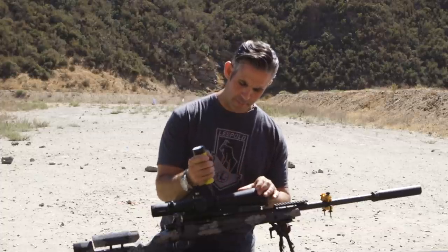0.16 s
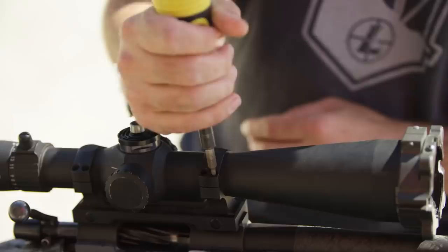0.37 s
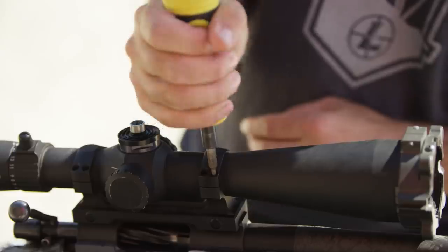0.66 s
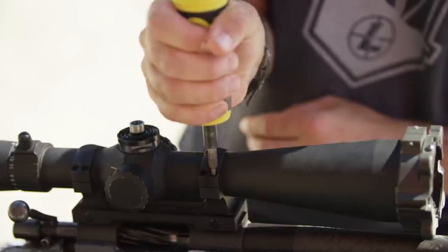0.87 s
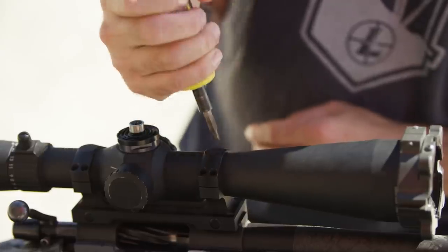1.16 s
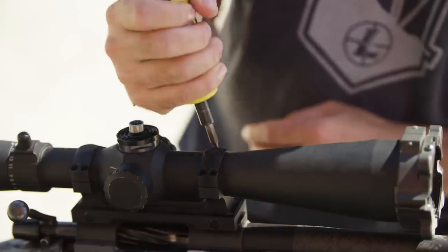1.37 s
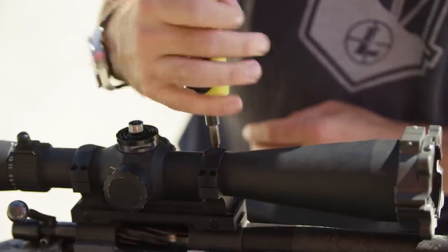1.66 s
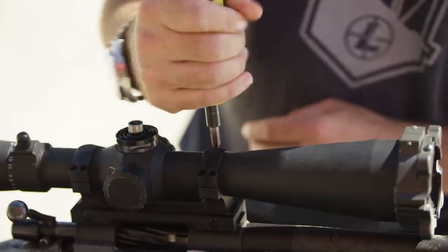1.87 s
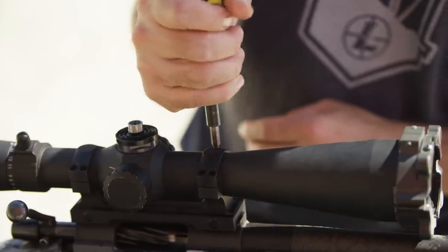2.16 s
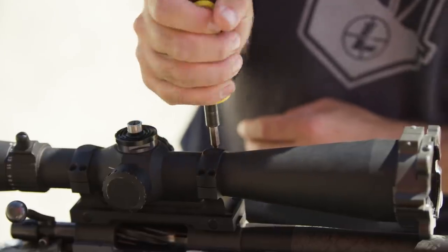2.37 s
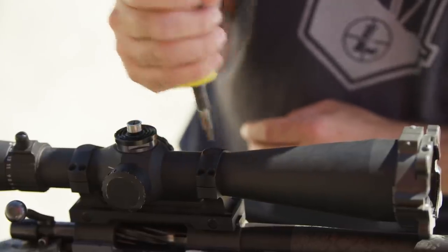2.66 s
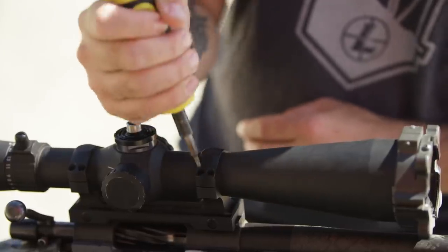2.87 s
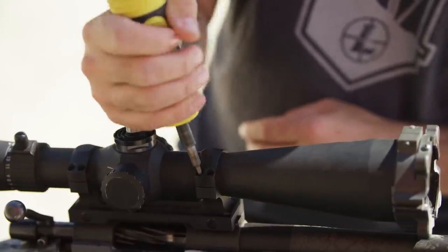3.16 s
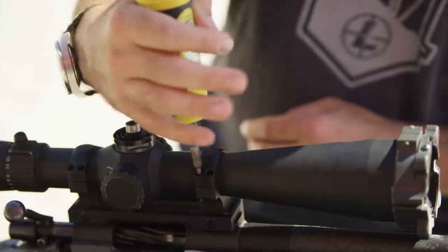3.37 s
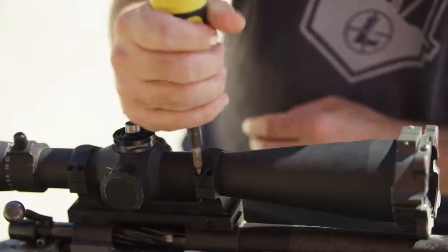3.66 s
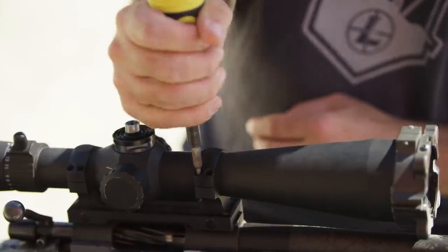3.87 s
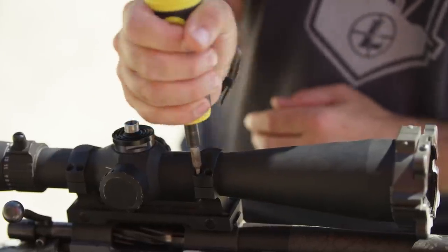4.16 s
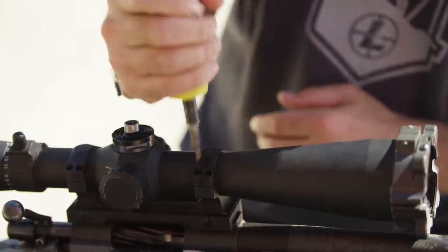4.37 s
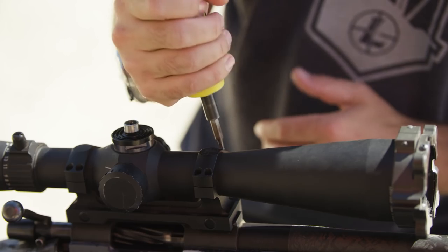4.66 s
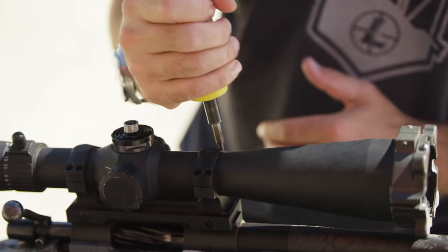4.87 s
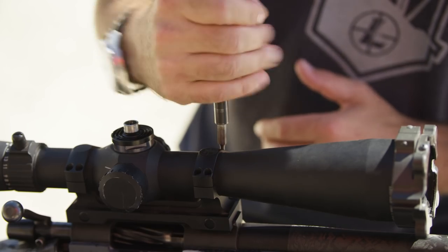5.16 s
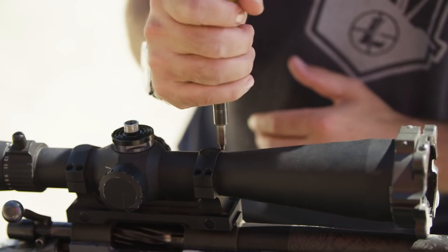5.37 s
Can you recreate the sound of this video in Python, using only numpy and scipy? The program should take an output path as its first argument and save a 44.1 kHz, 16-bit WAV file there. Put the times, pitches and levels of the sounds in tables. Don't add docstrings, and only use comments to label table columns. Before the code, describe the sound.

Outdoors in open air, heard close by a body-worn microphone with little reverberation. From 0 to 0.4 s there is quiet air, soft low wind, a faint sleeve rustle, tiny ticks and a thin metallic ring. At about 0.44 s the background changes abruptly to a faint distant machine drone with a weak steady whine and slightly brighter hiss. A bit clicks onto a screw at 0.5 s. Loud, sharp steel double clicks snap at 0.88, 2.49 and 4.09 s, each with a brief rattle and short metallic decay through the mount. Between them come light taps, scrapes, finger rubs and dull knocks, with a strong clack at 2.1 s, more at 2.25 s and a cluster at 3.6 to 3.9 s. Low wind flutters and thumps, strongest from 1.1 to 2.9 s, with further puffs near 3.6 s. After 4.3 s it eases to soft low puffs, faint drone and a few small ticks until 5.5 s.

```python
import sys
import numpy as np
from scipy import signal
from scipy.fft import rfft, irfft, next_fast_len
from scipy.io import wavfile
from scipy.ndimage import uniform_filter1d, map_coordinates

SR = 44100
rng = np.random.default_rng(int(sys.argv[2]) if len(sys.argv) > 2 else 0)


def transcribe(u):
    v = np.clip(np.atleast_2d(u).T, -1, 1)
    q = np.round(v * 32767).astype(np.int16)
    wavfile.write(sys.argv[1], SR, q)


def how_loud(loudness_db):
    steps = np.asarray(loudness_db, float) / 20
    return 10 ** steps


N = 242671

# (time [s], level [dB])
WIND = [(0, -56), (.28, -60), (.38, -64), (.62, -58.5), (1.03, -49), (1.6, -53.5), (2.05, -56.5),
        (2.6, -47.5), (2.85, -48.5), (2.94, -63.5), (3.2, -59), (3.48, -58), (3.65, -53), (3.9, -62),
        (4.08, -52), (4.28, -53.5), (4.33, -72), (4.45, -69.5), (5.5, -69.5)]
# (time [s], peak [dB], length [s], sharpness [dB])
GUSTS = [(0.25, -68.5, 0.05, 10), (0.512, -55.5, 0.078, -7), (0.683, -63.5, 0.11, 6),
         (1.203, -47.5, 0.14, 2), (1.343, -51, 0.067, -8), (1.455, -51.5, 0.084, 2),
         (1.576, -48, 0.037, -13), (1.757, -49, 0.14, 5), (1.858, -50.5, 0.045, -2), (4.3, -65, 0.037, 2),
         (1.968, -46.5, 0.15, -6.5), (0.907, -60.5, 0.11, 4), (2.378, -54, 0.041, -37),
         (2.528, -62, 0.083, 4), (2.75, -58, 0.04, 0), (2.871, -54.5, 0.046, 6), (2.995, -54.5, 0.05, -5),
         (3.109, -52, 0.074, -17), (3.58, -53, 0.057, -7.5), (3.764, -56.5, 0.097, -2),
         (3.877, -58, 0.029, 0), (4.537, -52, 0.032, -9), (4.655, -55, 0.062, -23.5),
         (4.754, -61, .08, -19.5), (4.866, -64, 0.039, -23), (4.978, -59, 0.068, -10.5)]
# (frequency [Hz], level [dB])
LOW_EDDIES = [(12, -28.5), (25, 2), (50, 4), (85, -3), (130, -33), (300, -59.5)]
SMALL_EDDIES = [(50, -31), (95, 0.5), (130, -5), (200, -13), (330, -20), (600, -35), (1200, -77)]
# (time [s], peak [dB], rate [Hz], lean [0-1])
POPS = [(1.447, -36, 60.7, 0.83), (1.661, -42, 60.6, 0.75), (2.631, -33.5, 60, 0.8),
        (2.695, -38, 60.7, 0.66), (3.74, -32.5, 64.3, 0.75), (4.535, -53, 60.1, 0.38),
        (4.644, -49.5, 59.6, 0.5), (4.743, -48.5, 60, 0.6), (4.852, -57, 60, 0.5), (.654, -41, 88.5, 0.6),
        (0.732, -40.5, 69.5, 0.56), (0.932, -38.5, 100, .45), (1.004, -40.5, 60.4, 0.06),
        (1.123, -39, 90, .7), (1.154, -34.5, 100, 0.36), (1.176, -33.5, 120, 0.3), (1.197, -34.5, 79, 0.65),
        (1.219, -37, 80, 0.96), (1.237, -36, 70, .8), (1.569, -43, 50, 0.3), (1.587, -41, 60, 0.04),
        (1.697, -42, 100, 0.1), (1.707, -35, 99, 0.46), (1.735, -42, 99, .2), (1.766, -33, 81, 0.3),
        (1.782, -36, 120, 0.9), (1.797, -44, 82, .9), (1.807, -37, 101, 0.4), (1.918, -37, 40, .9),
        (2.455, -41, 80.06, 0.1), (2.484, -36, 102.5, 0), (2.878, -43.5, 39.7, 0.72),
        (3.563, -39.5, 80, 0.6), (3.578, -40.5, 78.7, 0.76)]
SHELTER_S, EXPOSED_DB, SHELTERED_DB = 4.32, -3, -25.5

# (frequency [Hz], density [dB per Hz])
OPEN_AIR = [(120, -26), (200, 3.5), (425, -2), (1350, -6), (1550, -22), (1610, -9), (5000, -37),
            (6500, -64), (11000, -120)]
DRONE = [(88, -41.5), (150, -21.5), (367, -20), (425, -12.5), (464, -16), (660, -9.5), (764, -7.5),
         (799, -5.5), (1090, -13), (1240, -30), (1540, -28.5), (1640, -14.5), (1800, -11), (2000, -19),
         (2440, -24.5), (3130, -28.5), (5000, -36.5), (6500, -68.5), (11000, -120)]
# (frequency [Hz], density [dB per Hz])
DULL_HISS = [(2060, -37), (3500, -7), (12100, -7), (13300, -18), (15400, -14.5), (16500, -24)]
HISS = [(2060, -38.5), (3500, -11.5), (6360, -8), (8970, -5), (10500, -3), (12200, -10.5), (15300, -9),
        (16100, -16), (16500, -33.5)]
# (time [s], level [dB])
WHINE = [(.44, -65), (.9, -69), (1.12, -85), (1.24, -72), (1.86, -70.5), (1.98, -64), (2.27, -66),
         (2.58, -69), (3.6, -67.5), (3.74, -75), (3.88, -69), (4.23, -70), (4.75, -65.5), (4.92, -72),
         (5.5, -70)]
# (time [s], length [s], lift [dB])
BRUSH = [(3.303, 0.39, 2), (4.7, 0.49, 1), (2.4, .25, 2), (1.1, .3, 0.4), (3.2, .3, 1.5),
         (5.24, 0.33, -1.5)]
CUT_S, BLADE_HZ = .437, 758.5
OPEN_DB, DRONE_DB, DULL_DB, HISS_DB = -68.5, -64, -80.5, -77

# (frequency [Hz], level [dB])
CLOTH = [(500, -31.5), (900, 4), (1300, -0.5), (2500, -7.5), (4500, -14.5), (8000, -39)]
# (time [s], length [s], level [dB])
SHIFTS = [
    (0.01, 0.2, -74.5),
    (2.35, 0.38, -72),
]
RUSTLE_DB, SETTLED_DB = -73.5, -80

# (start [s], stop [s])
RING_S = [(0, .2), (0, .15), (0, .22), (.014, .243), (.345, .4), (.512, .56), (2.108, 2.17), (2.257, 2.33),
          (4.923, 4.98), (3.62, 3.66), (3.669, 3.7), (3.686, 3.72), (2.072, 2.105)]
# (frequency [Hz], level [dB], t60 [s], rise [s])
LONE_RINGS = [(1186, -66, 0.82, 0.00092), (2080, -62, 0.18, .001), (2310, -65, 0.7, .001),
              (2887, -56.5, 0.78, 0.015), (1670, -55.5, 0.093, 0.0026), (2350, -54, 0.087, 0.0018),
              (1643, -33.5, 0.057, 0.00091), (662, -48, 0.1, 0.0034), (5870, -56.5, 0.0462, .001),
              (1610, -47.5, 0.045, 0.0016), (1655, -38, 0.053, 0.0021), (1630, -46, 0.037, 0.0018),
              (1700, -59, 0.11, .003)]

# (time [s], shaft [dB], mount [dB], tip [dB])
SEATS = [(0.0687, -48, -66, -76), (0.2534, -71, -60.5, -85), (0.5106, -38.5, -48, -88),
         (0.5299, -44, -53, -78), (1.1534, -54.5, -62, -60), (1.2435, -64, -79, -53.5),
         (1.4484, -66, -58.5, -70), (1.7664, -33, -45.5, -54.5), (1.933, -46.5, -56, -75.5),
         (2.0127, -68, -67, -66), (2.031, -75, -47.5, -58), (2.0753, -52, -48, -70),
         (2.1068, -25, -36.5, -52), (2.1094, -46, -47, -49.5), (2.241, -31, -47, -64),
         (2.2546, -36.5, -45.5, -71), (2.267, -37, -54, -71), (2.565, -49, -55, -78),
         (2.5933, -38.5, -53, -80), (2.6126, -56, -54, -79), (2.7313, -48, -46, -57),
         (3.087, -56, -57.5, -74.5), (3.3025, -56, -50, -60), (3.8166, -46.5, -74, -74),
         (3.883, -35, -56, -67), (4.2972, -70, -61, -71.5), (4.9592, -58, -56.5, -76.5),
         (.197, -62, -74, -85), (.236, -71, -73, -85), (.325, -60, -60, -82), (.376, -66, -63, -83),
         (3.828, -55, -70, -64)]
TAPS = [(.063, -44, -65, -78), (0.29, -75, -63, -86), (.3436, -70, -61, -81), (0.5019, -43, -52, -62),
        (0.684, -53.5, -64, -56.5), (0.874, -40, -36.5, -69), (0.876, -53, -55, -69.5),
        (1.3846, -50, -55, -65), (1.7719, -63, -50, -58), (2.0706, -40.5, -40.5, -46),
        (2.117, -52, -60, -72), (3.2236, -57, -72, -55.5), (3.6201, -51, -52.5, -68.5),
        (3.6697, -42, -43.5, -75), (3.676, -33.5, -49, -80.5), (3.6863, -35.5, -48, -81),
        (3.7693, -42, -53, -60), (3.863, -42.5, -68, -57), (3.8744, -34.5, -43.5, -72),
        (3.879, -55.5, -56, -59), (4.3063, -58, -61, -45), (4.7152, -52, -53, -61), (0.108, -62, -57, -75),
        (.222, -69, -72, -85), (2.174, -62, -70, -75)]
GRAZES = [(.783, -48.5, -70, -61), (1.052, -81, -61.5, -72), (1.547, -49, -64, -57.5),
          (2.15, -63, -73.5, -73), (2.2442, -32.5, -44.5, -45), (2.2933, -50, -69, -63),
          (2.32, -55, -68, -63), (2.7258, -49, -56, -46), (2.7453, -43, -59, -46),
          (2.7514, -48.5, -57.5, -54), (3.275, -55, -64.5, -61), (3.38, -56, -63, -76),
          (4.3347, -54.5, -63, -62), (4.9232, -49.5, -65.5, -74.5), (4.933, -58, -64, -74),
          (.645, -58, -80, -80), (.61, -62, -70, -72), (2.767, -68, -73, -63), (.995, -64, -71, -68)]
# (frequency [Hz], t60 [s])
CONTACT = [
    (3050, 0.01),
    (3900, 0.009),
    (5950, 0.018),
]
# (frequency [Hz], width [Hz], level [dB])
TIP = [(6800, 900, -8), (8550, 700, 0.5), (10900, 1200, 1), (12380, 1200, -2.5), (14300, 1800, -11.5)]
# (time [s], level [dB], frequency [Hz], t60 [s])
KNOCKS = [(0.9, -42.5, 734, 0.086), (.883, -49, 710, 0.067), (2.108, -38.5, 710, 0.16),
          (2.245, -40.5, 580, 0.094), (2.257, -57, 860, 0.12), (2.49, -40.5, 695, 0.033),
          (3.303, -49.5, 820, 0.026), (3.876, -39, 660, 0.13), (3.876, -44, 230, 0.23),
          (2.11, -45, 254, 0.11), (3.879, -34, 1170, 0.035), (3.672, -49, 1240, 0.054),
          (4.095, -41.5, 800, 0.05), (2.112, -42, 1260, 0.044), (1.9, -39.5, 1220, 0.026),
          (2.492, -48, 360, 0.027), (.884, -45, 390, .06), (4.096, -50, 270, 0.075), (0.0051, -59, 750, .2)]

# (time [s], length [s], level [dB], centre [Hz])
RUBS = [(0.132, 0.078, -65.5, 2780), (0.152, 0.034, -61, 6250), (0.293, 0.0058, -64, 7300),
        (0.324, 0.098, -75.5, 3500), (1.066, 0.018, -67, 8070), (1.13, 0.015, -67, 8000),
        (3.313, 0.024, -70, 5000), (3.664, 0.079, -70, 3000), (3.82, 0.054, -70.5, 5980),
        (3.866, 0.022, -68, 2000), (2.266, 0.029, -70, 4000), (2.464, 0.025, -67.5, 2990),
        (2.4, 0.064, -69, 4600)]

# (leaving [s], landing [s], rebound [s])
STRIKE_S = [
    (.8830, .8841, .8845),
    (2.4916, 2.4927, 2.4931),
    (4.0942, 4.0953, 4.0957),
]
# (leaving [dB], landing [dB], rebound [dB], rattle [dB])
SLIPS = [
    (-6.5, -2, -14.5, -27.5),
    (-10.5, -2, -17.5, -26.5),
    (-7.5, -5, -7, -27),
]
CAM_HZ = [2270, 2750, 4280, 4830, 6050, 6900, 8240, 8750, 9850, 10400, 11200, 12200, 12900, 13800]
# (width [Hz], slip 1 [dB], slip 2 [dB], slip 3 [dB])
CAM = [(450, -10.5, -12.5, -11.5), (400, -22.5, -18.5, -14), (395, -2, -15, 2), (350, -1, -19, -15),
       (400, -9.5, -10, -5.5), (450, -14.5, -12, -18), (350.3, -15, -5, -14.5), (400, -7, -8.5, -5),
       (400, -6.5, -8.5, -3.5), (450, -4, 1, -4), (600, 2.5, -0.5, 3.5), (499.8, -12.5, -15, 0),
       (499, -8.5, -13, -4.5), (600, -9.5, -14.5, 2)]
EDGE_DB = [-18.5, -13, -14.5]
SHEEN_DB = [-26, -23.5, -24]
# (frequency [Hz], density [dB per Hz])
RATTLE = [(290, -57), (500, -25), (1190, -7.5), (1520, -8), (1660, -8), (1810, -16.5), (2320, -1),
          (3070, -9.5), (11000, -2.5), (16500, -33)]
MURMUR_DB = [-17, -18.5, -19.5]
MURMUR_T60_S = 0.2
MOUNT_HZ = [1150, 1222, 1448, 1669, 1972, 2070, 2342, 2704, 2826, 2200, 2520]
# (t60 [s], slip 1 [dB], slip 2 [dB], slip 3 [dB])
MOUNT = [(0.22, -45.5, -44.5, -52.5), (.3, -45.5, -53.5, -47), (0.054, -56, -53, -48),
         (0.11, -32.5, -34, -34.5), (.16, -46, -39, -48), (0.13, -46.5, -35, -40),
         (0.22, -43.5, -44.5, -40), (0.08, -36, -36.5, -43), (0.07, -43, -46.5, -44.5),
         (.12, -48.5, -45, -45), (.14, -46.5, -48, -45.5)]
MOUNT_RISE_S, MOUNT_WIDTH_HZ, MOUNT_WAKES_DB = 0.014, 90, -0.5
TWIN_GAP, TWIN_DB, TWIN_LIFE = .011, -5.5, 0.41


def unit(x):
    return x / np.sqrt(np.mean(x ** 2) + 1e-20)


def curves(rows):
    s, *cols = np.transpose(rows)
    return [np.interp(np.arange(N) / SR, s, c) for c in cols]


def wobble(rate, size=N):
    knots = rng.standard_normal(int(size * rate / SR) + 4)
    return map_coordinates(knots, [np.arange(size) * rate / SR])


def filtered(x, response):
    m = next_fast_len(len(x) + min(8192, len(x) // 3))
    return irfft(rfft(x, m) * response(np.fft.rfftfreq(m, 1 / SR)), m)[:len(x)]


def noise(spectrum, size=N):
    f, db = np.transpose(spectrum)
    colour = lambda hz: how_loud(np.interp(np.log(hz + 1), np.log(f), db))
    return unit(filtered(rng.standard_normal(size), colour))


def steady(x, span_s):
    power = np.abs(uniform_filter1d(x * x, round(span_s * SR)))
    return unit(x / np.sqrt(power + 0.2))


def bell(s, length):
    return np.exp(-(2 * (np.arange(N) / SR - s) / length) ** 2)


def switch(s, before, after, span_s):
    share = np.clip((np.arange(N) / SR - s) / span_s, 0, 1)
    return (1 - share) * before + share * after


def add(track, s, sound):
    part = track[round(s * SR):][:len(sound)]
    part += sound[:len(part)]


def resonance(f, hz, width_hz):
    return 1j * f * width_hz / (hz * hz - f * f + 1j * f * width_hz)


def body(modes):
    return lambda f: sum((-1) ** k * how_loud(db) * resonance(f, hz, w) for k, (hz, w, db) in enumerate(modes))


def ring(hz, db, t60, t, rise, grip_db):
    grip = how_loud(grip_db * wobble(55, size=len(t)))
    drift = .15 * grip_db * wobble(45, size=len(t))
    decay = how_loud(db - 60 * t / t60) * (1 - np.exp(-t / rise))
    return grip * decay * np.sin(2 * np.pi * hz * t + drift)


def burst(hz, width_hz, fade):
    push = fade * rng.standard_normal(len(fade)) * how_loud(3.2 * wobble(900, size=len(fade)))
    push[8] += 4 * fade.max()
    x = filtered(push, lambda f: resonance(f, hz, width_hz) ** 3)
    return x / np.abs(x).max()


def wind():
    breeze = how_loud(curves(WIND)[0])
    low = breeze + sum(how_loud(db) * bell(s, length) for s, db, length, _ in GUSTS)
    small = breeze * how_loud(switch(SHELTER_S, EXPOSED_DB, SHELTERED_DB, span_s=0.036))
    small = small + sum(how_loud(db + sharp_db) * bell(s, length) for s, db, length, sharp_db in GUSTS)
    lumps = 1.3 * wobble(23)
    out = low * unit(how_loud(lumps) * steady(noise(LOW_EDDIES), span_s=0.023))
    fine_lumps = how_loud(2 * lumps + 1.2 * wobble(45))
    out = out + small * unit(fine_lumps * steady(noise(SMALL_EDDIES), span_s=.05))
    for s, db, hz, lean in POPS:
        u = (np.arange(SR // 10) / SR - .02) * hz * 4.15
        add(out, s - .02, 2 * how_loud(db) * (u + lean - .5) * np.exp(-u * u))
    return out


def surroundings():
    far = switch(CUT_S, how_loud(OPEN_DB) * noise(OPEN_AIR), how_loud(DRONE_DB) * noise(DRONE), span_s=.003)
    hiss = switch(CUT_S, how_loud(DULL_DB) * noise(DULL_HISS), how_loud(HISS_DB) * noise(HISS), span_s=.003)
    phase = 2 * np.pi * BLADE_HZ * np.arange(N) / SR + 0.5 * wobble(8.5)
    tone = np.sin(phase) * how_loud(curves(WHINE)[0] + 1.6 * wobble(25) + 3.0)
    brush_db = sum(db * bell(s, length) for s, length, db in BRUSH)
    out = how_loud(0.28 * wobble(20)) * far + switch(CUT_S, 0, tone, span_s=.003)
    return out + how_loud(0.44 * wobble(8.2) + brush_db) * hiss


def cloth():
    effort = how_loud(switch(SHELTER_S, RUSTLE_DB, SETTLED_DB, span_s=0.17))
    effort = effort + sum(how_loud(db) * bell(s, length) for s, length, db in SHIFTS)
    return effort * how_loud(3.3 * wobble(30)) * noise(CLOTH)


def lone_rings():
    out = np.zeros(N)
    for (start, stop), (hz, db, t60, rise) in zip(RING_S, LONE_RINGS):
        t = np.arange(round((stop - start) * SR)) / SR
        damping = np.clip((t[-1] - t) / 0.0099, 0, 1)
        add(out, start, ring(hz, db, t60, t, rise, grip_db=1.5) * damping)
    return out


def bit():
    out, t = np.zeros(N), np.arange(SR // 8) / SR
    fade = lambda t60: how_loud(-60 * t / np.clip(t60, .003, .2)) * (1 - np.exp(-t / 0.00032))
    mount_modes = body([(hz, MOUNT_WIDTH_HZ, 0) for hz in MOUNT_HZ])
    for contacts, (shaft_hz, t60) in zip((SEATS, TAPS, GRAZES), CONTACT):
        for s, shaft_db, mount_db, tip_db in contacts:
            ping = burst(shaft_hz, .4 * shaft_hz, fade(t60))
            overtone = burst(1.3 * shaft_hz, 0.96 * shaft_hz, fade(2.5 * t60))
            shaft = how_loud(shaft_db - 5.5) * (ping + how_loud(-1.0) * overtone)
            thud = burst(2100, 3800, fade(1.1 * t60) + how_loud(-17.5) * fade(0.23))
            woken = filtered(burst(1900, 2500, fade(1.1 * t60)), mount_modes)
            mount = how_loud(mount_db + 3.5) * thud
            mount = mount + how_loud(mount_db + MOUNT_WAKES_DB) * woken / np.abs(woken).max()
            tip = filtered(burst(10000, 9000, fade(.6 * t60)), body(TIP))
            add(out, s, shaft + mount + how_loud(tip_db + 5.5) * tip / np.abs(tip).max())
    for s, db, hz, t60 in KNOCKS:
        add(out, s, how_loud(db) * burst(hz, 1.0 * hz, fade(t60)))
    return out


def fingers():
    grain = how_loud(3.4 * wobble(340))
    out = np.zeros(N)
    for s, length, db, hz in RUBS:
        skin = unit(filtered(rng.standard_normal(N), lambda f: resonance(f, hz, 1.56 * hz) ** 2))
        out += how_loud(db) * bell(s, length) * grain * skin
    return out


def cam():
    out, t = np.zeros(N), np.arange(SR // 3) / SR
    for k, (times, (*strike_db, rattle_db)) in enumerate(zip(STRIKE_S, SLIPS)):
        steel = lambda f: sum(how_loud(dbs[k]) * resonance(f, hz, w) for hz, (w, *dbs) in zip(CAM_HZ, CAM))
        for at, db in zip(times, strike_db):
            chatter = 0.15 * rng.standard_normal(len(t)) * how_loud(-60 * t / 0.0036)
            blow = (t == 0) + chatter
            contact = 1 - np.exp(-(t + 1 / SR) / 0.00011)
            strike = filtered(blow, steel) * contact
            add(out, at, how_loud(db) * strike / np.abs(strike).max())
        add(out, times[0], how_loud(EDGE_DB[k]) * burst(5400, 7000, how_loud(-60 * t / .004)))
        add(out, times[0], how_loud(SHEEN_DB[k]) * burst(15200, 3000, how_loud(-60 * t / 0.0074)))

        fade = how_loud(-60 * t / .03) + how_loud(-11.0 - 60 * t / 0.13)
        rattle = noise(RATTLE, size=len(t))
        dense_band = unit(filtered(rattle, lambda f: resonance(f, 1800, 2700) ** 2))
        murmur = how_loud(MURMUR_DB[k] - 60 * t / MURMUR_T60_S) * dense_band
        add(out, times[1], how_loud(rattle_db) * (fade * rattle + murmur))

        for hz, (t60, *dbs) in zip(MOUNT_HZ, MOUNT):
            mode = ring(hz, dbs[k], t60, t, MOUNT_RISE_S, grip_db=1.33)
            twin_hz, twin_db = hz * (1 - TWIN_GAP), dbs[k] + TWIN_DB
            twin = ring(twin_hz, twin_db, TWIN_LIFE * t60, t, MOUNT_RISE_S, grip_db=5.5)
            add(out, times[0], mode + twin)
    return out


def scene():
    return (wind() + surroundings() + cloth() + lone_rings() + bit() + fingers() + cam())[None]


def top_cut(x):
    return signal.sosfilt(signal.butter(12, 17030, fs=SR, output="sos"), x)


def record(dry):
    heard = filtered(dry[0], lambda f: 1 / (1 + (f / 16000) ** 24))[None]
    heard = heard / (1 + np.abs(heard / .62) ** 6) ** (1 / 6)
    return top_cut(heard)


dry = scene()
out = record(dry)
transcribe(out)
```